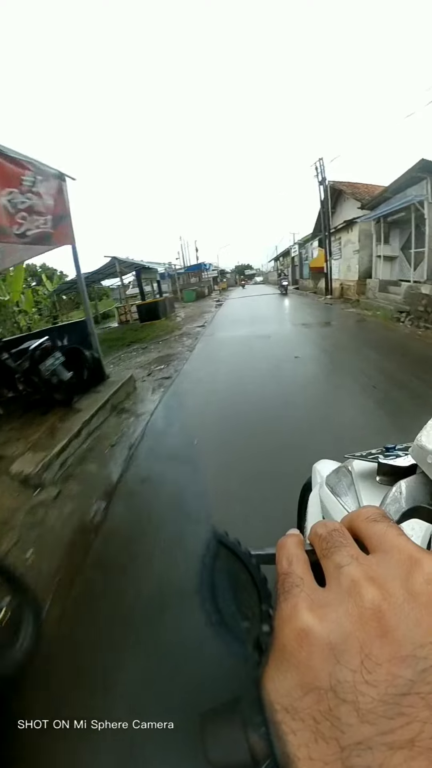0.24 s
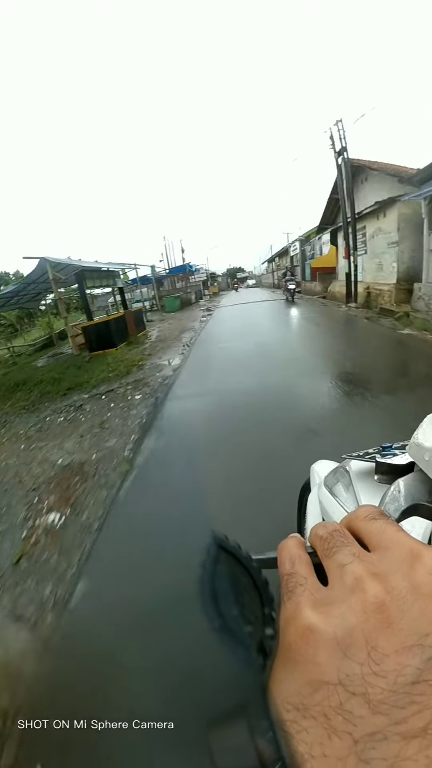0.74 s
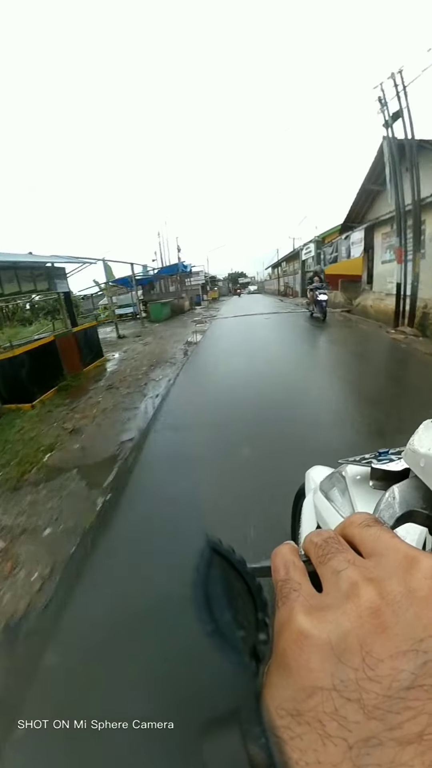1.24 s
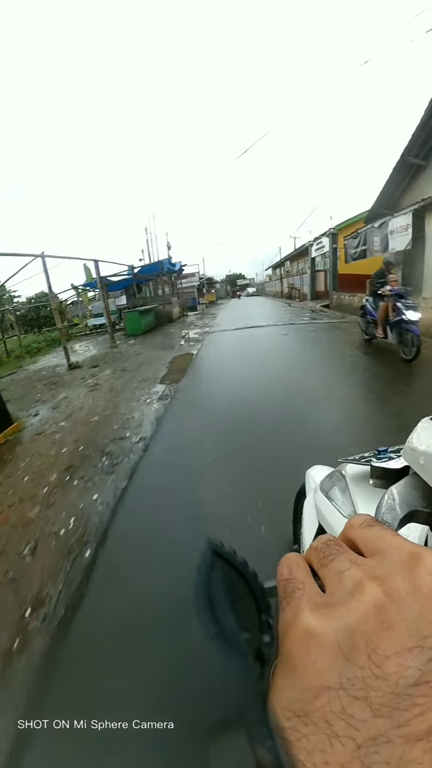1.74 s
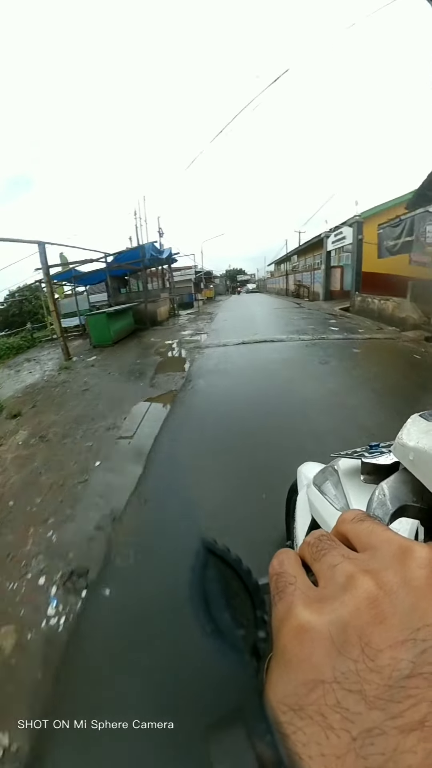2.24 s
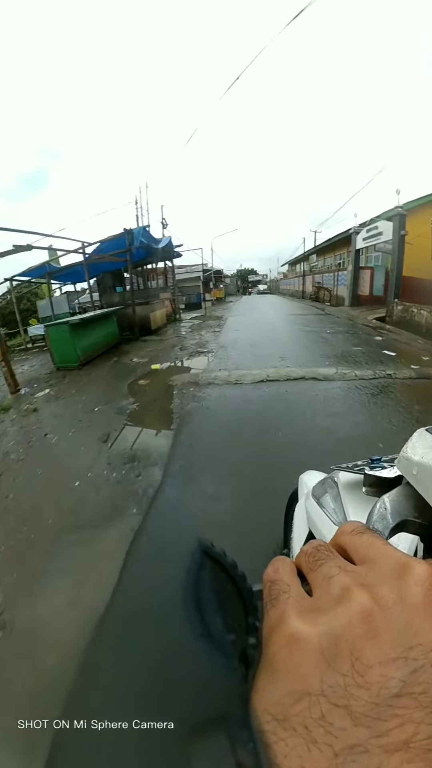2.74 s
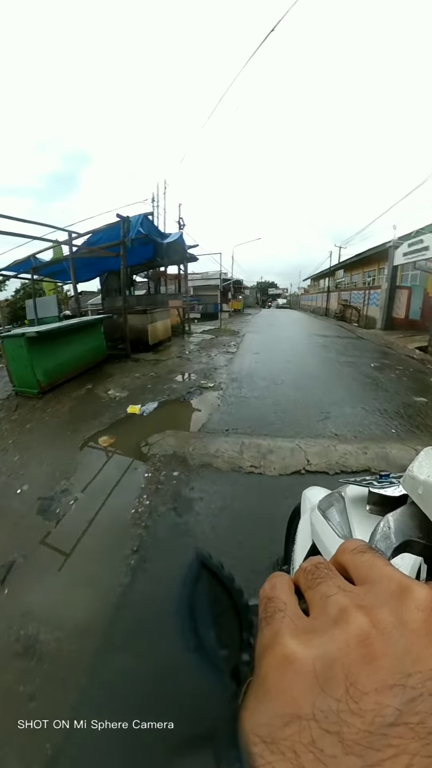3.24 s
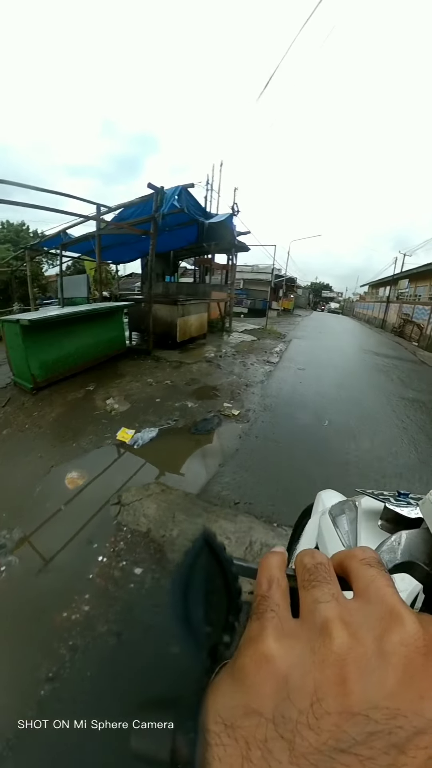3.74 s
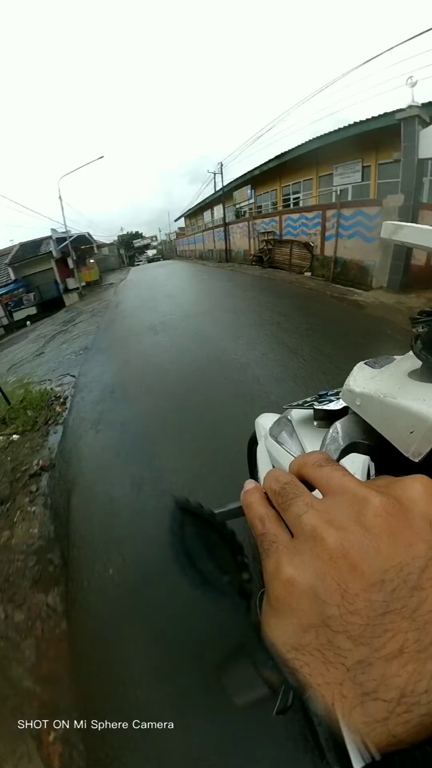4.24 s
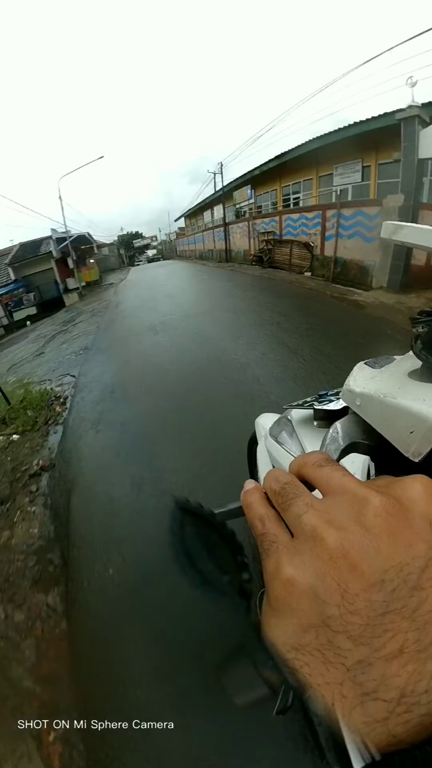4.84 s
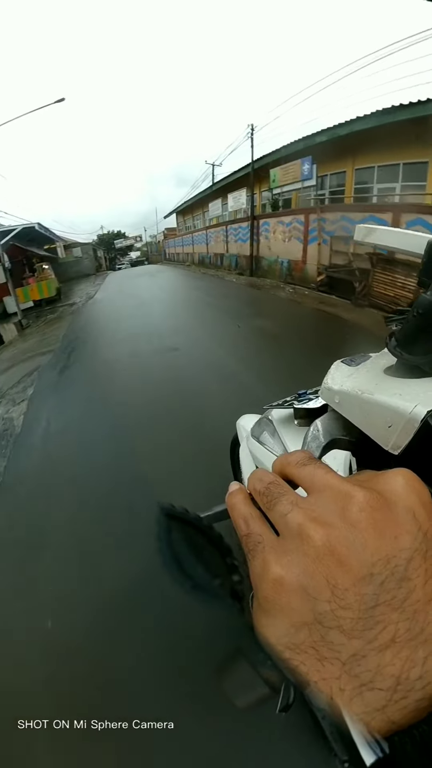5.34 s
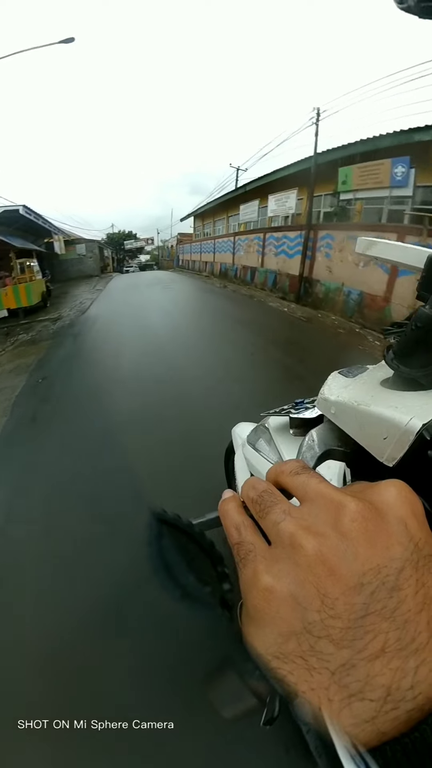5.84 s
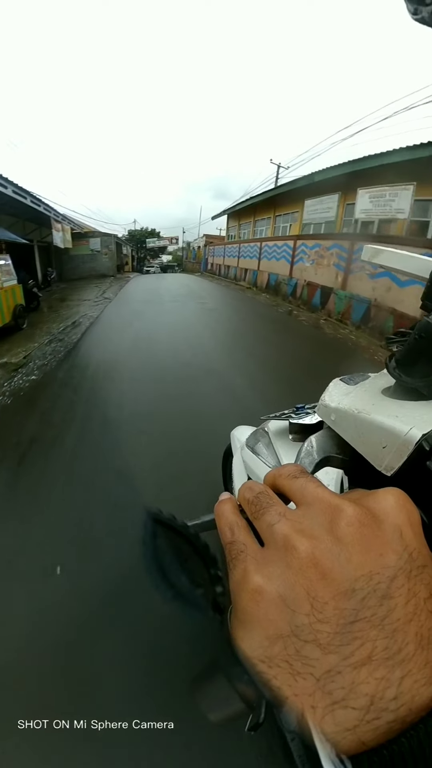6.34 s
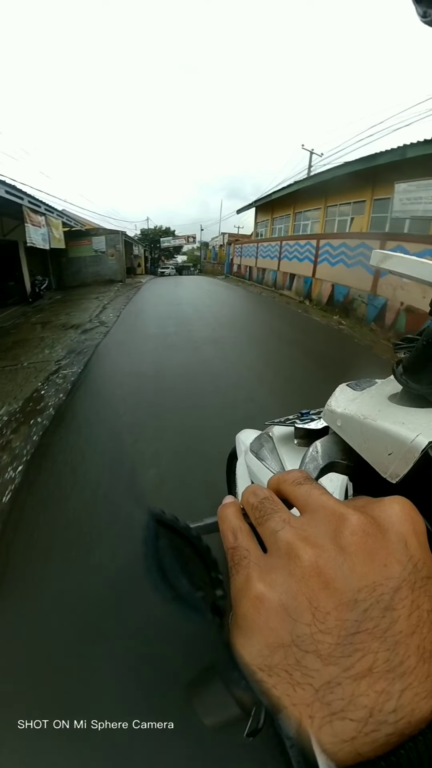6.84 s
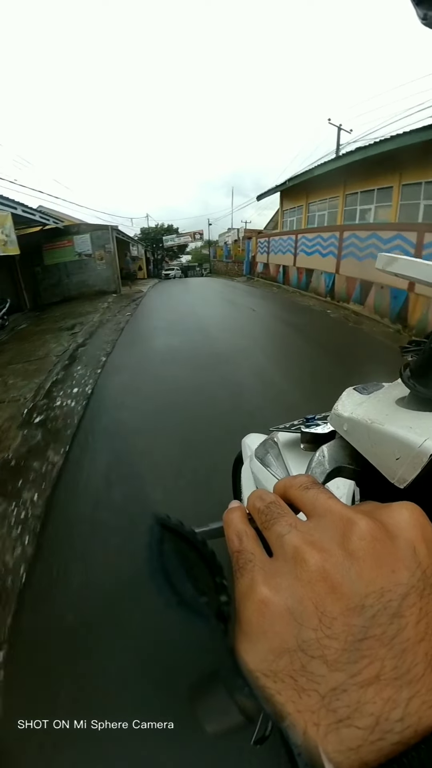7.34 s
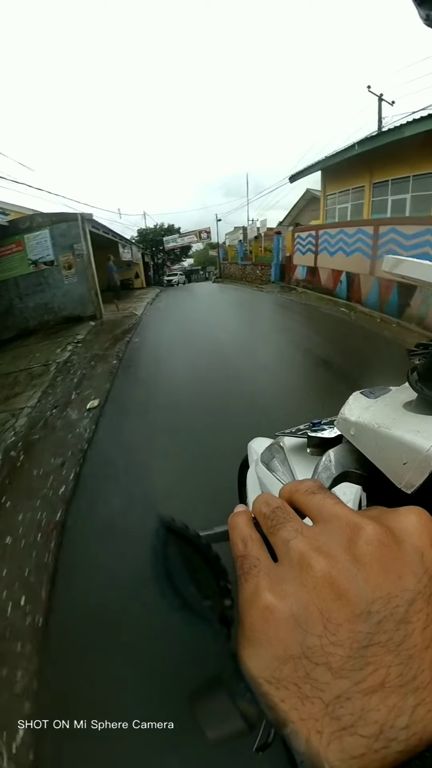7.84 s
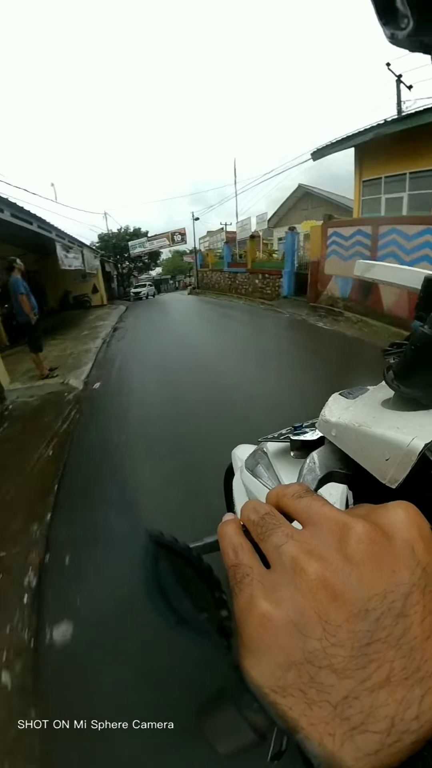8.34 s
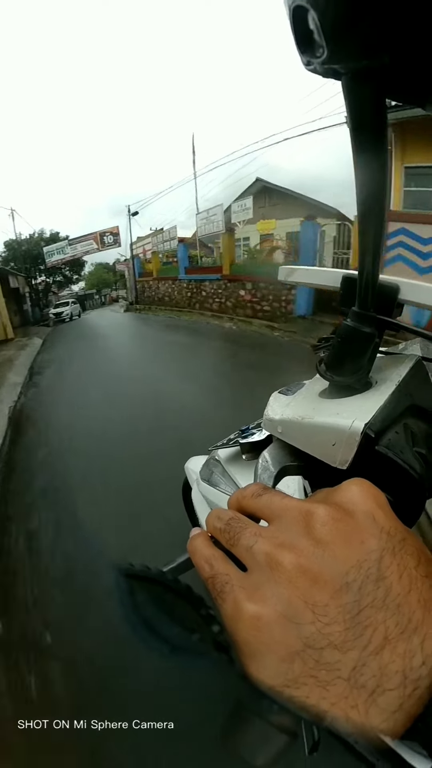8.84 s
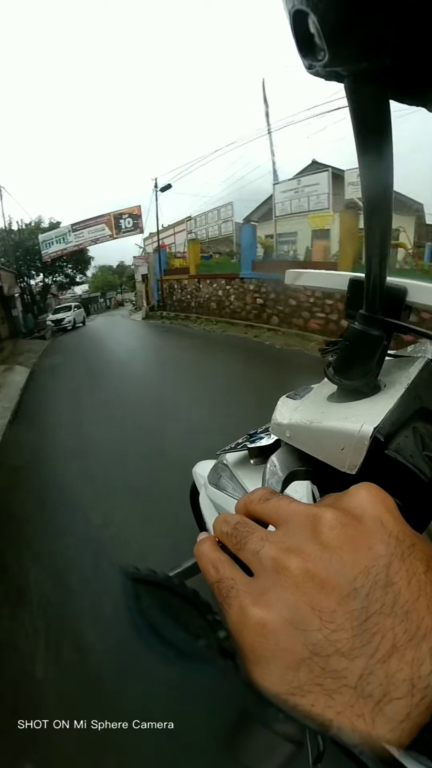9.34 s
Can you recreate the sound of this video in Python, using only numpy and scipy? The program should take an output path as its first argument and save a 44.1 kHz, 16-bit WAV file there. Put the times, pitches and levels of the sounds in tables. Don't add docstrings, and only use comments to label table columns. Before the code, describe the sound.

Close on a handlebar: soft tyre roar and low engine hum, a clattering bump, a short dropout, water pops, then stronger buzzing ride and ticking parts.

```python
import sys
import numpy as np
from scipy import signal
from scipy.fft import rfft, irfft, next_fast_len
from scipy.io import wavfile
from scipy.ndimage import uniform_filter1d, map_coordinates

SR = 44100
rng = np.random.default_rng(int(sys.argv[2]) if len(sys.argv) > 2 else 0)


def ratio_of_db(decibels):
    return 10 ** (np.asarray(decibels, float) / 20)


def inscribe(sig):
    pcm = np.round(np.clip(np.atleast_2d(sig).T, -1, 1) * 32767)
    wavfile.write(sys.argv[1], SR, pcm.astype(np.int16))


N = 422919


def unit(x):
    return x / np.sqrt(np.mean(x ** 2) + 1e-20)


def curves(rows):
    s, *cols = np.transpose(rows)
    return [np.interp(np.arange(N) / SR, s, c) for c in cols]


def wobble(rate, size=N):
    coarse = np.arange(0, size + 64, 64)
    knots = rng.standard_normal(int(N * rate / SR) + 4)
    return np.interp(np.arange(size), coarse, map_coordinates(knots, [coarse * rate / SR]))


def coloured(x, spectrum):
    m = next_fast_len(N + 8192)
    f, db = np.transpose(spectrum)
    log_hz = np.log(np.fft.rfftfreq(m, 1 / SR) + 1)
    gain = ratio_of_db(np.interp(log_hz, np.log(f), db, -120, -120))
    return unit(irfft(rfft(x, m) * gain, m)[:N])


def shaking(jolt_db, jolt_rate, streak_db=0):
    z = signal.stft(rng.standard_normal(N), nperseg=2048)[2]
    field = uniform_filter1d(rng.standard_normal(z.shape), size=12, axis=1)
    noise = signal.istft(z * ratio_of_db(streak_db * unit(field)), nperseg=2048)[1][:N]
    return ratio_of_db(jolt_db * wobble(jolt_rate)) * noise


def tone(hz, db, span, blur_hz):
    t, out = np.arange(N) / SR, np.zeros(N)
    on = (t > span[0]) & (t < span[1])
    edge = np.clip(np.minimum(t[on] - span[0], span[1] - t[on]) / 0.053, 0, 1)
    turns = np.cumsum(hz[on] + blur_hz * wobble(25.08, on.sum())) / SR + rng.random()
    level = ratio_of_db(db[on] + 0.7 * wobble(12, on.sum()))
    out[on] = np.sqrt(2) * edge * level * np.sin(2 * np.pi * turns)
    return out


def follower(x, hold_s):
    return signal.lfilter([1], [1, -np.exp(-1 / (hold_s * SR))], np.abs(x)) / (hold_s * SR)


def ride():
    # (time [s], tyre roar for road speed [dB], casing chatter for engine shake [dB])
    motion = [(0.0, -46, -45), (1.04, -50, -50), (1.65, -51.5, -47.5), (2.2, -55.5, -49.5),
              (2.62, -55.5, -49.5), (2.92, -55.5, -45.5), (2.96, -57.5, -52), (3.15, -57.5, -55.5),
              (3.56, -59, -57), (4.2, -65, -55), (4.35, -55.5, -47), (4.6, -50.5, -41), (5.2, -49.5, -42),
              (5.8, -47.5, -40), (6.3, -47, -37), (7.95, -46, -37), (8.6, -45.5, -40.5), (9.59, -45.5, -42)]
    # (time [s], length [s], extra shake [dB])
    jolts = [(1.715, .04, 1), (3.035, .02, 5), (3.168, 0.033, 4), (3.346, 0.073, 6), (3.378, .02, 2),
             (3.396, .025, 0), (3.43, 0.026, 2), (3.472, .014, 1), (3.58, .05, 7), (6.42, 0.12, 0.5),
             (6.93, 0.084, 2.5), (8.698, 0.054, 7), (8.762, 0.063, 7), (8.805, 0.03, 4)]
    # (frequency [Hz], level [dB per Hz])
    roar = [
        [(21, -70.5), (35, -40), (48, -27), (62, -20.5), (80, -11.5), (182, -10.5), (227, -14.5), (255, -9), (337, -6), (379, -2), (445, -1), (596, -15), (822, -3.5), (1150, -7), (1500, -27), (2530, -120)],
        [(21, -45), (35, -23.5), (49, -22), (75, -12), (103, -10.5), (144, -8.5), (211, -11), (271, -10), (445, 2.5), (538, -1), (596, -12), (937, -5), (1070, -14.5), (1150, -15), (1500, -38), (2530, -120)],
    ]
    casing = [
        [(650, -37.5), (1100, -28.5), (1170, -1), (1280, -1.5), (1730, 6), (2280, -4), (2960, -42), (5020, -120)],
        [(650, -20), (1100, -13.5), (1230, -7.5), (1460, 4), (1510, -1), (1640, 1.5), (1810, 2.5), (1940, -1.5), (2170, -19), (2280, -16), (2960, -74), (5020, -120)],
    ]
    mount = [
        [(1320, -43.5), (2250, -29), (2470, -9), (2630, 1), (2760, 3), (2910, -1), (3070, -13), (3300, -20), (4290, -48), (7260, -120)],
        [(1320, -51), (2250, -5.5), (2460, -3.5), (2570, 1.5), (2680, 4.5), (3070, -9.5), (3300, -13.5), (4290, -26), (7260, -120)],
    ]
    spray = [
        [(1880, -36), (3200, -4.5), (4540, -1.5), (4930, -5.5), (5510, -4.5), (6320, -8), (6840, -11.5), (7610, -21.5), (8200, -24), (10700, -52), (18000, -120)],
        [(1880, -33), (3200, -5.5), (3490, -14), (3840, -3.5), (4150, -11), (4650, -6), (5170, -11.5), (7230, -18), (8200, -45), (10700, -54), (18000, -120)],
    ]
    t = np.arange(N) / SR
    late = t > 4
    speed_db, shake_db = curves(motion)

    jolt_db = np.zeros(N)
    for s, length, db in jolts:
        jolt_db += db * np.cos(np.pi * np.clip((t - s) / length, -.5, .5)) ** 2
    puddle_end_s, puddle_fade_s, puddle_db = 6.56, .5, 4.5
    drying = np.clip(4 * (t - puddle_end_s) / puddle_fade_s, -50, 50)
    puddle = late * puddle_db / (1 + np.exp(drying))
    brake_db = 1.5 * np.clip((t - 2.7) / .1, 0, 1) * np.clip((2.945 - t) / .015, 0, 1)

    def follow(db, mean_db, base_db, slope):
        slow, fast = [base_db[i] + slope[i] * (db - mean_db[i]) for i in (0, 1)]
        return np.where(late, fast, slow)

    mount_db = follow(shake_db, mean_db=(-49, -40), base_db=(-53.5, -49), slope=(.79, .89))
    mount_db = mount_db + np.where(late, .36, 1.15) * jolt_db + brake_db
    spray_db = follow(speed_db, mean_db=(-54, -47), base_db=(-57.5, -68), slope=(.15, .61)) + puddle

    chatter = shaking(jolt_db=1.0, jolt_rate=170, streak_db=2) * ratio_of_db(0.35 * wobble(22))
    rumble = shaking(jolt_db=1.0, jolt_rate=60, streak_db=2)
    splashing = shaking(jolt_db=0.66, jolt_rate=73, streak_db=2)
    layers = [(speed_db + 0.398 * jolt_db, rumble, roar), (shake_db + jolt_db, chatter, casing),
              (mount_db, chatter, mount), (spray_db, splashing, spray)]
    out = np.zeros(N)
    for db, noise, (slow, fast) in layers:
        out += ratio_of_db(db) * np.where(late, coloured(noise, fast), coloured(noise, slow))
    return out


def idling():
    # (time [s], firing rate [Hz], third harmonic [dB], fourth harmonic [dB])
    coasting = [(0, 29.5, -57, -54), (.12, 29.2, -52.5, -50), (.6, 29.2, -55, -57),
                (1.2, 28.94, -56.5, -59.5), (1.5, 28.7, -61, -62), (1.62, 28.7, -57, -68),
                (1.85, 28.44, -57.5, -62), (1.98, 28.46, -64, -70), (2.1, 28.4, -58, -59),
                (2.4, 28.18, -60, -64.5), (2.55, 27.8, -61, -63), (2.8, 27.6, -64, -62),
                (3.05, 27.7, -60.5, -65), (3.2, 28.1, -62, -70), (3.4, 27.9, -59, -72),
                (3.57, 28.5, -55, -68)]
    # (harmonic number [1], relative level [dB])
    orders = [(1, -26.5), (2, -20.5), (3, -2), (4, -1), (5, -7.5), (6, -9), (7, -9.5), (8, -15.5), (9, -9),
              (10, -6), (11, -19), (12, -30), (13, -8.5)]
    t = np.arange(N) / SR
    hz, third_db, fourth_db = curves(coasting)
    span = (-1, 3.7)
    upper_db, sink_db_per_s = -59, 2
    out = tone(4 * hz, fourth_db, span, blur_hz=.4)
    for k, db in orders:
        if k == 4:
            continue
        base_db = third_db
        if k > 4:
            waver_db = (2 + .5 * t) * wobble(6) - 1
            base_db = upper_db - sink_db_per_s * t * k / 8 + waver_db
        out += tone(k * hz, db - dict(orders)[3] + base_db, span, blur_hz=.12 * k)
    return out


def pulling():
    # (time [s], twice the shaft rate [Hz], load [dB])
    throttle = [(4.3, 108, -66), (5.5, 111, -78), (6.7, 112.7, -60.5), (7.2, 111.2, -62),
                (7.7, 107.7, -56.5), (8, 108.3, -65), (8.6, 103.5, -54), (8.95, 103.3, -56.5),
                (9.15, 100.8, -69), (9.6, 100.4, -54)]
    # (frequency [Hz], level [dB])
    pipe = [(198, -62), (207, -78), (216, -72.5), (224, -63.5)]
    hz, load_db = curves(throttle)
    shaft_db = np.full(N, -69.5)
    pipe_db = np.interp(2 * hz, *np.transpose(pipe))
    out = np.zeros(N)
    for k, db in ((.5, shaft_db), (1, load_db), (2, pipe_db)):
        out += tone(k * hz, db, (4.3, 10), blur_hz=0.41)
    return out


def gear_whine():
    # (time [s], frequency [Hz], level [dB])
    mesh = [(5.62, 1400, -52), (5.71, 1410, -41), (5.75, 1415, -54), (5.79, 1428, -44), (5.86, 1432, -47),
            (5.95, 1445, -39), (6.21, 1460, -36), (6.32, 1478, -43), (6.4, 1482, -62), (6.9, 1540, -42),
            (7.35, 1555, -41), (7.65, 1545, -40.5), (7.9, 1552, -44), (8.05, 1545, -53), (8.5, 1510, -44.5),
            (8.8, 1500, -46), (9, 1495, -59), (9.6, 1496, -49)]
    return tone(*curves(mesh), (mesh[0][0], 10), blur_hz=2.1)


def hums():
    # (start [s], end [s], first frequency [Hz], last frequency [Hz], level [dB])
    singing = [(5.4, 5.85, 1756, 1755, -45), (6.2, 6.5, 1755, 1752, -43), (6.7, 7.35, 1743, 1729, -42),
               (0, .45, 1195, 1175, -55), (6.3, 7.24, 207, 209, -60), (2.15, 2.65, 89.5, 91, -60),
               (3.26, 3.5, 60, 58, -59), (2.62, 2.8, 1880, 1930, -52), (2.76, 2.95, 1700, 1700, -50),
               (2.7, 2.8, 2700, 2740, -51), (2.84, 2.93, 2780, 2700, -49), (.6, .9, 389, 376, -57),
               (1.6, 2.25, 380, 376, -61), (2.42, 2.55, 378, 376, -60), (4.6, 5.9, 552, 547, -61),
               (6.3, 7.45, 546, 541, -57), (5.45, 5.65, 1455, 1465, -46), (6.45, 6.6, 1680, 1680, -42),
               (4.7, 5.6, 620, 618, -64)]
    swell_db, waver_db = 5.5, 2
    out = np.zeros(N)
    for start, end, first_hz, last_hz, db in singing:
        middle = ((start + end) / 2, (first_hz + last_hz) / 2, db)
        hz, level_db = curves([(start, first_hz, db - swell_db), middle, (end, last_hz, db - swell_db)])
        level_db = level_db + waver_db * wobble(5)
        out += tone(hz, level_db, (start - .04, end + .04), blur_hz=first_hz * .0015)
    return out


def squeak():
    # (time [s], frequency [Hz], level [dB])
    rub = [(1.512, 2810, -58.5), (1.53, 2900, -41), (1.548, 2990, -42), (1.564, 2970, -38.5),
           (1.576, 2830, -45), (1.585, 3000, -48), (1.62, 2950, -49.5), (1.64, 2880, -53),
           (1.665, 2840, -57)]
    hz, db = curves(rub)
    u = np.arange(N) / SR - 1.535
    slip_hz, slip_gain_hz_per_s = 68, 220
    slip_turns = slip_hz * u + slip_gain_hz_per_s * u ** 2 / 2
    slip_db = np.interp(u, (.03, .05), (1.5, 5.5)) * np.cos(2 * np.pi * slip_turns)
    return tone(hz + 25 * wobble(150), db + slip_db, (1.46, 1.7), blur_hz=10)


def knocks():
    # (time [s], peak [dB], frame [Hz], mount part [dB], hollow part [dB])
    rattle = [(.42, -34, 2060, -8, -17), (1.352, -37, 1800, -8, -15), (1.3577, -34.5, 2100, 1, -19),
              (1.394, -39, 1870, 0, 3), (1.499, -34, 1800, -10, -19), (1.616, -27.5, 1800, -5, -17),
              (1.711, -31, 1508, -10, -15), (1.732, -37, 1420, -12, -15), (2.9362, -29, 1700, -15, -19),
              (3.166, -38, 1750, -10, -6), (3.1698, -44, 1500, -12, 5.5), (3.2031, -32, 1780, 3.5, -10),
              (3.219, -47, 1700, 11, -8), (3.292, -40, 2300, -3, -15), (3.2963, -32, 2050, -6, -20),
              (3.309, -27.5, 1970, 5, -25), (3.3147, -39, 2290, 9, -9), (3.3262, -42, 1810, 12, -8),
              (3.373, -38, 2000, -2, -15), (3.378, -35, 2050, -2, -15), (3.393, -45, 1920, 6, -10),
              (3.399, -44, 2400, 8, -8), (3.408, -49, 1800, -3, 8), (3.4245, -35, 1910, -5, -18),
              (3.437, -43, 2000, -10, -15), (3.471, -45, 2200, 4, -13), (3.5274, -36, 1800, -1, -2.5),
              (3.5565, -41, 2100, 6.5, -14), (3.562, -46, 1900, 6, -14), (3.572, -41, 2100, -2, -12)]
    # (time [s], peak [dB], frame [Hz], mount part [dB], bright part [dB])
    ticks = [(4.7, -24, 1940, -25, -25), (5.016, -30, 2050, -21, -25), (6, -26.5, 2090, -6, -24),
             (6.2028, -26, 2100, -4.5, -20), (6.3178, -27, 1850, -11, -25), (6.45, -28, 1820, -20, -23),
             (6.6645, -19.5, 1950, -13, -17), (6.8699, -20, 1650, -15, -25), (6.969, -26, 1990, -12, -18),
             (7.009, -24, 1800, -10, -25), (7.1213, -21, 1740, -27, -25), (7.384, -23, 2070, -12, -17),
             (7.5975, -29, 1900, -1, -25), (7.932, -32, 1897, 2, -22), (8.7, -28, 1600, -18, -25),
             (8.7062, -21, 1610, -22, -25), (8.716, -30, 1810, -10, -12), (8.723, -38, 2320, -4, -3),
             (8.7755, -23, 1670, -20, -19), (8.799, -27, 1700, -16, -24), (8.8382, -24, 1490, -11, -26),
             (9.2075, -26.5, 2100, -9, -11)]
    # (frequency [Hz], T60 [s])
    parts = [
        (2708, 0.011),
        (2930, .012),
        (966, 0.04),
        (3430, .009),
        (3900, .008),
    ]
    frame_t60_s, frame_twin = 0.013, 0.864
    rise_s = .0026
    rows = [(*row, -25.5) for row in rattle]
    rows += [(*row[:4], -18, row[4]) for row in ticks]
    out, t = np.zeros(N + SR), np.arange(SR // 20) / SR
    rise = np.sin(np.pi / 2 * np.clip(t / rise_s, 0, 1)) ** 2
    ringing_s = np.maximum(t - rise_s, 0)
    detunes = rng.standard_normal((len(rows), 7))
    for (s, db, frame_hz, mount_db, hollow_db, bright_db), detune in zip(rows, detunes):
        modes = [(frame_hz, frame_t60_s), (frame_hz * frame_twin, frame_t60_s)] + list(parts)
        levels_db = (-5, -10, mount_db - 2.5, mount_db - 16, hollow_db - 5.5, bright_db - 8.5, bright_db - 14.5)
        for (hz, t60), part_db, d in zip(modes, levels_db, detune):
            decay = ratio_of_db(db + part_db - 60 * ringing_s / t60)
            ring = np.sin(2 * np.pi * hz * (1 + 0.021 * d) * t + d)
            out[round(s * SR):][:len(t)] += decay * rise * ring
    return out[:N]


def drops():
    # (time [s], pressure step [dB], leak time [ms])
    splashes = [
        (4.37703, -4.6, .88),
        (4.44531, -4.5, 1),
        (4.44863, 3.3, .88),
        (4.45375, 2.9, .87),
        (4.62592, 0, 80),
        (4.64266, -12.8, 40),
        (5.12988, -.6, 170),
    ]
    # (time [s], level [dB])
    drain = [(4.63, -65), (4.655, -50), (4.7, -57), (4.75, -66), (4.8, -90)]
    out, film = np.zeros((2, N))
    for s, db, leak_ms in splashes:
        i = round(s * SR)
        t = np.arange(N - i) / SR
        rise_s = .00018 if leak_ms < 2 else .00016 if leak_ms < 100 else .000135
        rise = np.sin(np.pi / 2 * np.clip(t / rise_s, 0, 1))
        out[i:] += ratio_of_db(db) * rise * np.exp(-1000 * t / leak_ms)
        if leak_ms > 50:
            film[i - 330:i - 30] -= ratio_of_db(db - 28) * np.hanning(300)
            after = t[:-600]
            film[i + 600:] -= ratio_of_db(db - 30 - 700 * after) * np.sin(2 * np.pi * 50 * after)
    swing, vent = 2 * np.pi * 79.8, 2 * np.pi * 85
    low_cut = np.polymul([1, swing / 1.41, swing ** 2], [1, vent])
    pops = signal.lfilter(*signal.bilinear([1, 0, 0, 0], low_cut, SR), out)
    squeeze = 1 + 3.2 * follower(pops, .008)
    fizz = coloured(shaking(jolt_db=2.2, jolt_rate=190),
                    [(3000, -5.0), (4200, 0.5), (5000, -14.5), (5800, -8.0), (7000, -20.5), (8500, -40)])
    return pops / squeeze + film + ratio_of_db(curves(drain)[0]) * fizz


def circuit():
    # (frequency [Hz], level [dB per Hz])
    hiss = [
        [(4590, -34.5), (7800, -5.5), (10100, 4), (11300, -8.5), (12800, -14), (15200, -11.5), (16000, -23.5)],
        [(4120, -41), (7000, -23), (7550, -5.5), (8560, -1), (9490, 2.5), (10900, -8), (11900, -13), (15100, -12), (16000, -17)],
    ]
    late = np.arange(N) > 4 * SR
    t = np.arange(N) / SR
    turn = np.where(late, np.pi * 2.98 * t + .59, np.pi * 3.05 * t - .55) + .15 * wobble(3)
    upper, lower, steady = rng.standard_normal((3, N))
    upper_before = ratio_of_db(-75.5) * coloured(upper, [(9600, -28.5), (10400, -6.0), (11400, -9.0), (12400, -28.0)])
    upper_after = ratio_of_db(-78) * coloured(upper, [(9400, -25), (10100, 0), (11000, -4), (11900, -22)])
    upper = np.where(late, upper_after, upper_before)
    lower = ratio_of_db(-75) * coloured(lower, [(7800, -26.5), (8600, -3.5), (9600, -4.5), (10300, -24.0)])
    steady = np.where(late, ratio_of_db(-72.5) * coloured(steady, hiss[1]), ratio_of_db(-70.5) * coloured(steady, hiss[0]))
    wake = ratio_of_db(late * -6 * np.exp(-np.abs(t - 4.25) / 0.18))
    return wake * (steady + np.cos(turn) * upper + np.sin(turn) * lower)


def scene():
    pops = drops()
    bed = ride() + idling() + pulling() + gear_whine() + hums() + squeak() + knocks() + circuit()
    band_limit = signal.ellip(12, .1, 80, 15600, fs=SR, output="sos")
    bed = signal.sosfilt(band_limit, bed)
    return (bed / (1 + 10 * follower(pops, 0.044)) + pops)[None]


def roll_off(x):
    return signal.sosfilt(signal.butter(12, 16800, fs=SR, output="sos"), x)


def record(dry):
    # (time [s], gain [dB])
    dropout = [(3.5888, 0), (3.5903, -62), (3.594, -140), (4.228, -140), (4.237, -40), (4.243, -30),
               (4.247, -6), (4.262, -3), (4.3, 0)]
    band_limit = signal.ellip(8, .05, 40, 16500, fs=SR, output="sos")
    limited = signal.sosfiltfilt(band_limit, dry)
    return roll_off(limited * ratio_of_db(curves(dropout)[0]))


dry = scene()
out = record(dry)
inscribe(out)
```